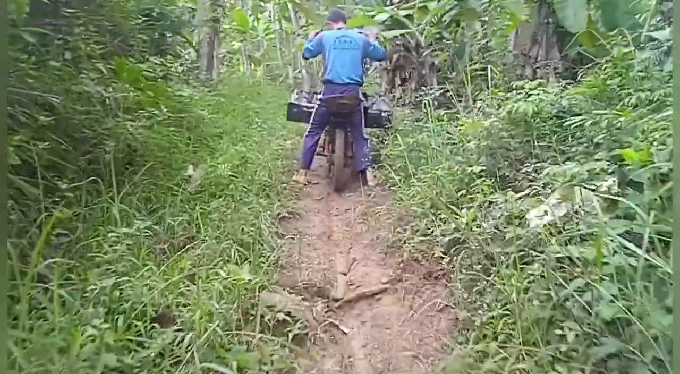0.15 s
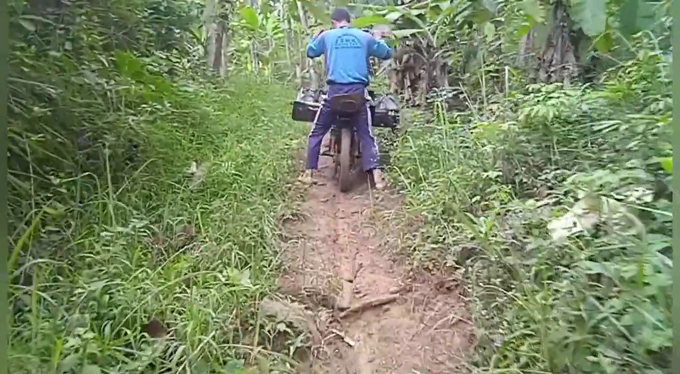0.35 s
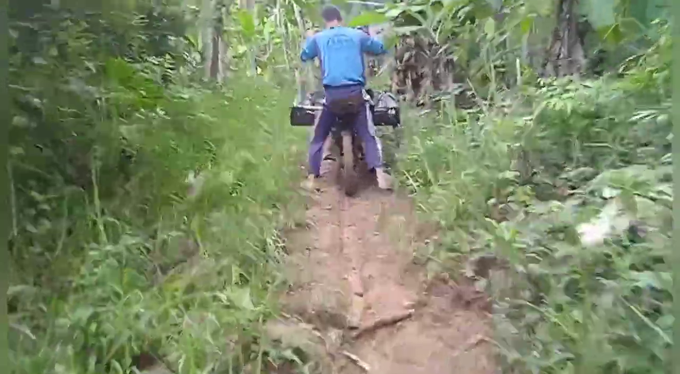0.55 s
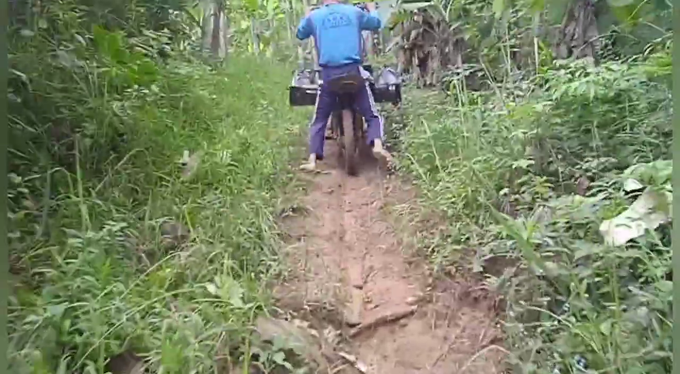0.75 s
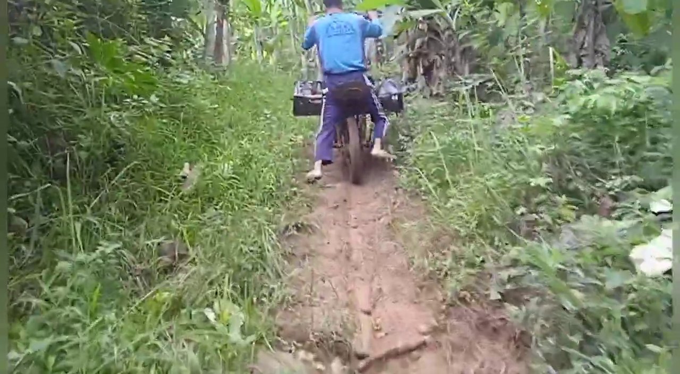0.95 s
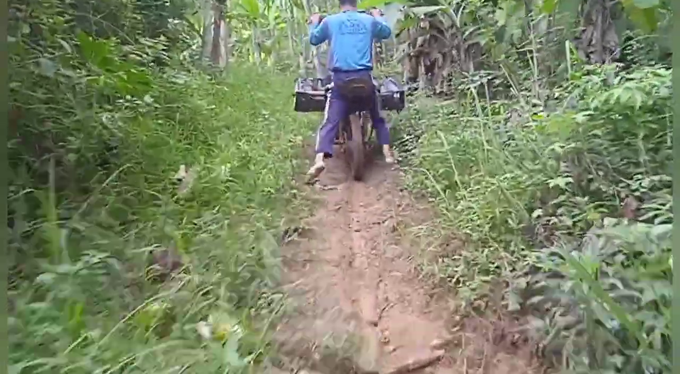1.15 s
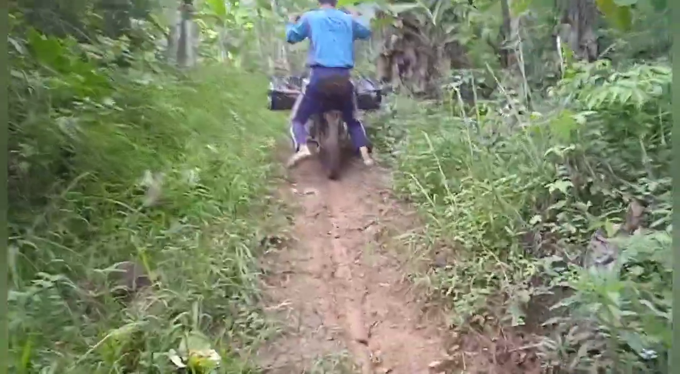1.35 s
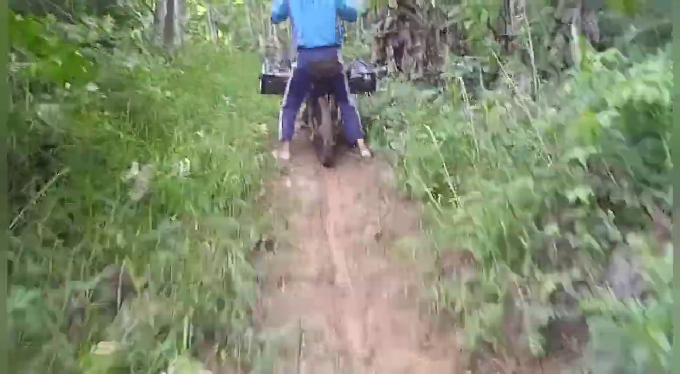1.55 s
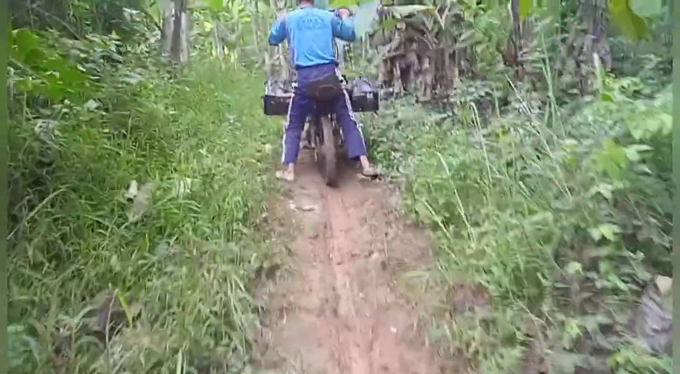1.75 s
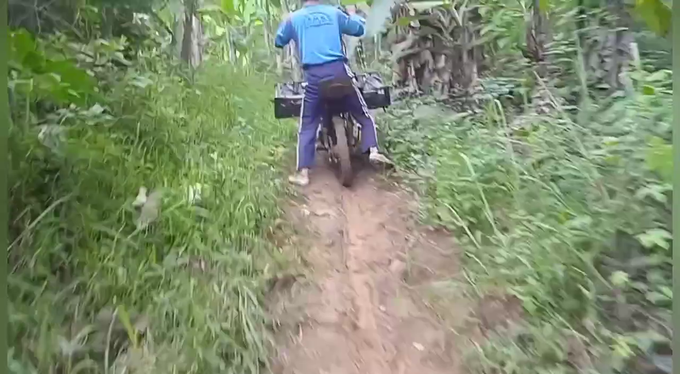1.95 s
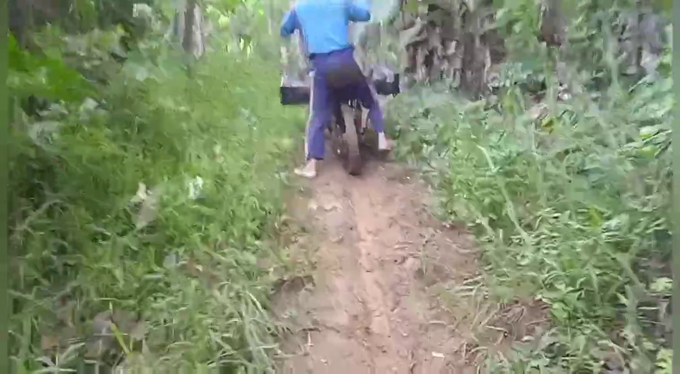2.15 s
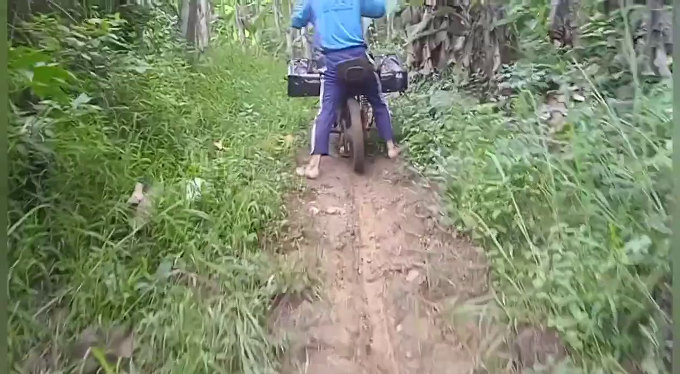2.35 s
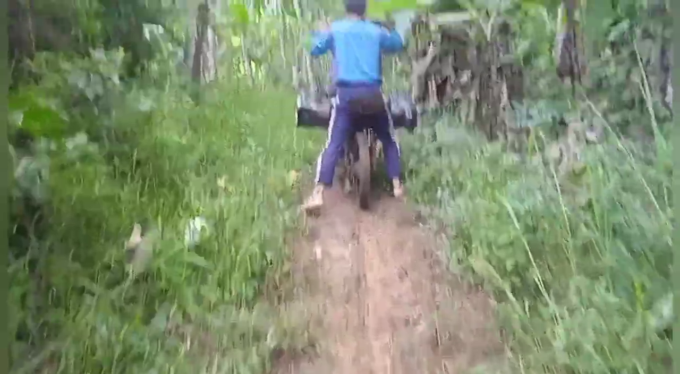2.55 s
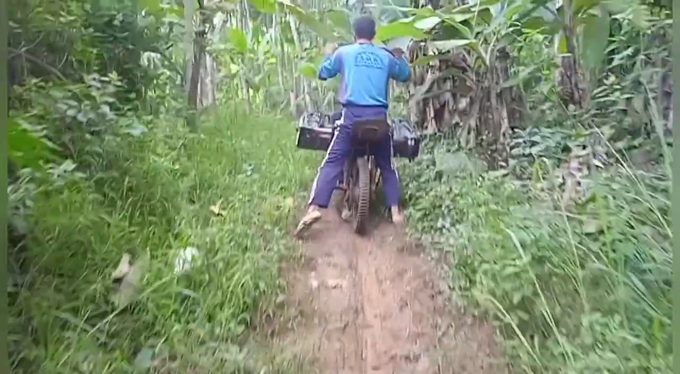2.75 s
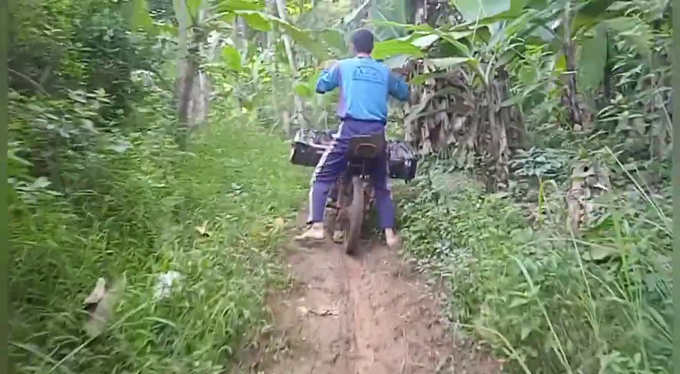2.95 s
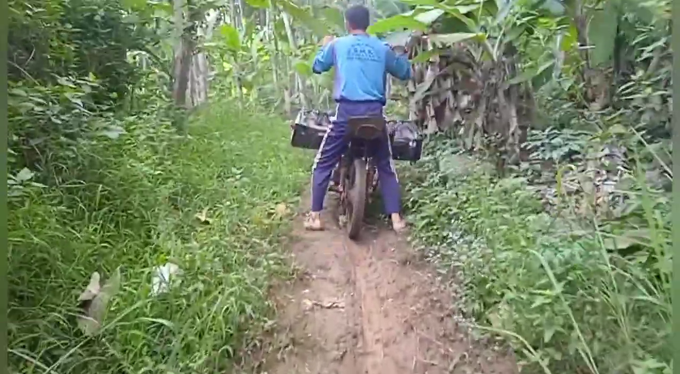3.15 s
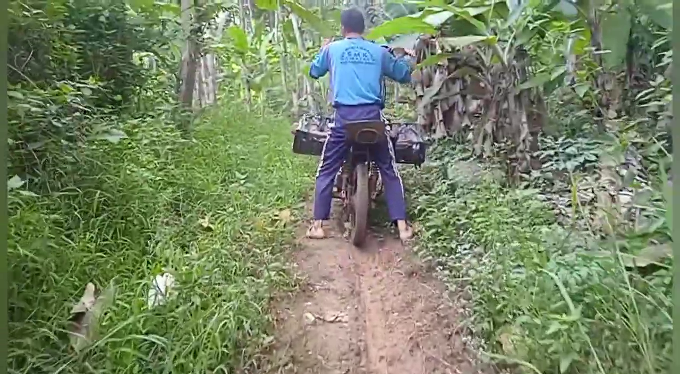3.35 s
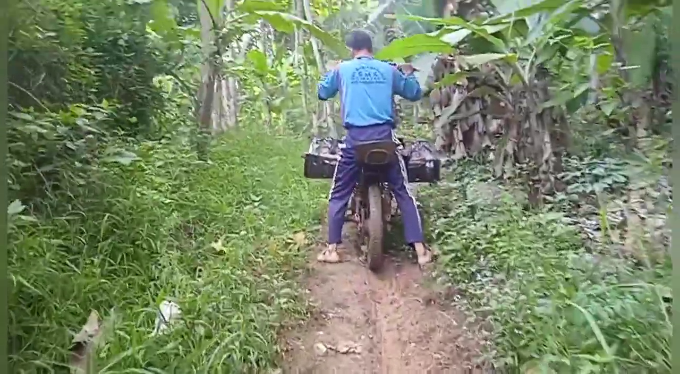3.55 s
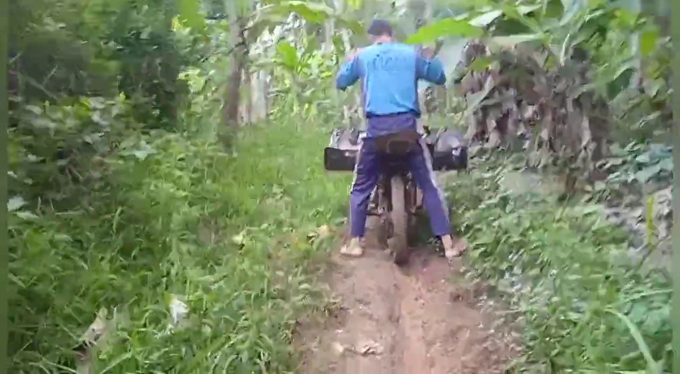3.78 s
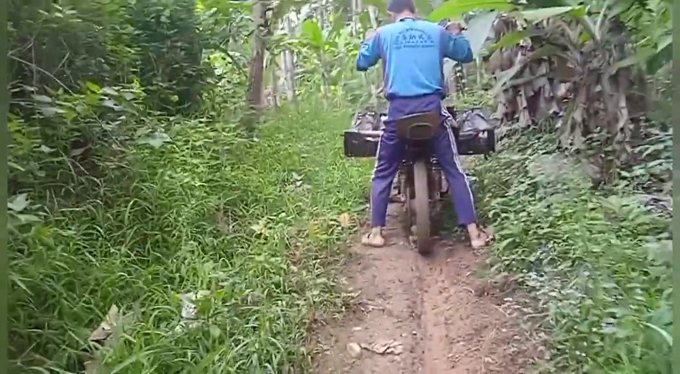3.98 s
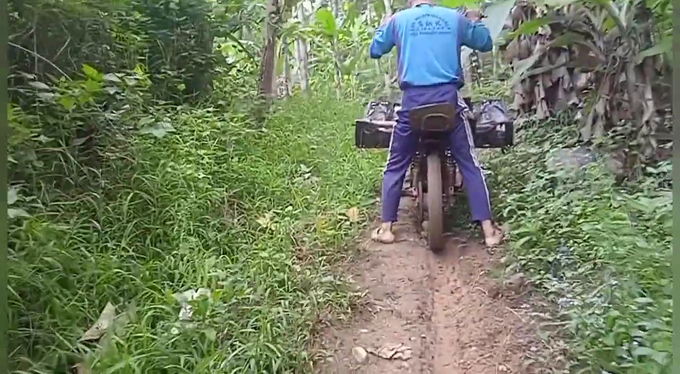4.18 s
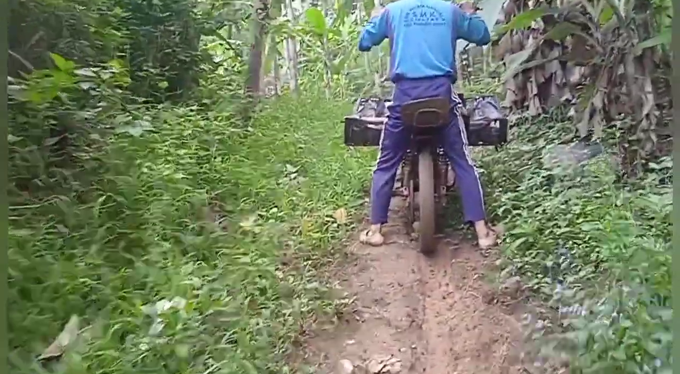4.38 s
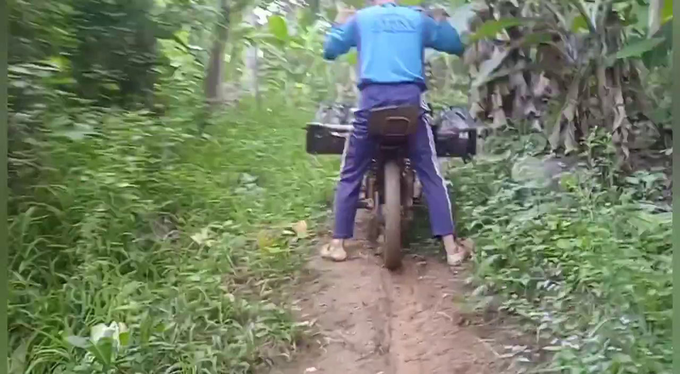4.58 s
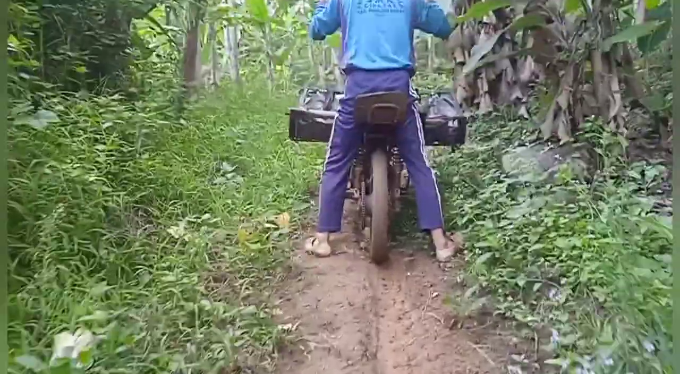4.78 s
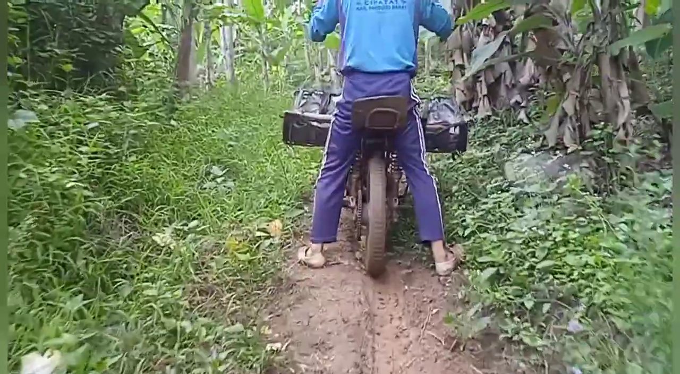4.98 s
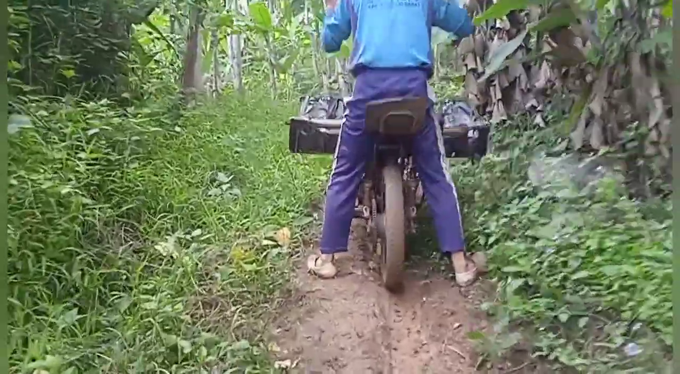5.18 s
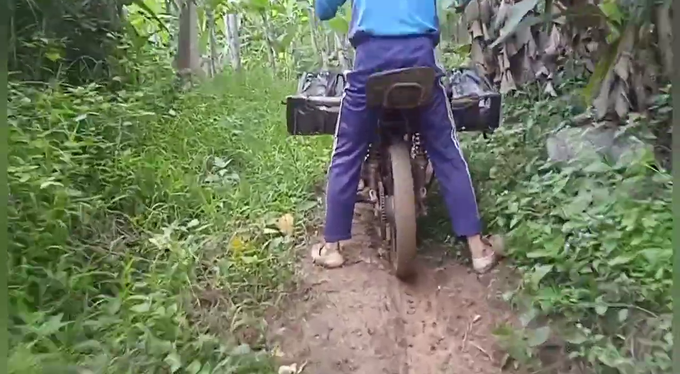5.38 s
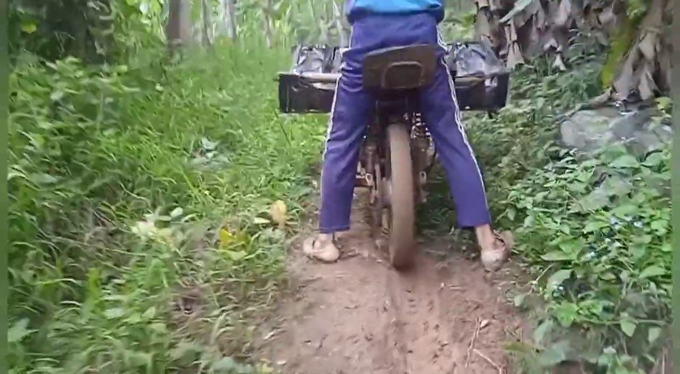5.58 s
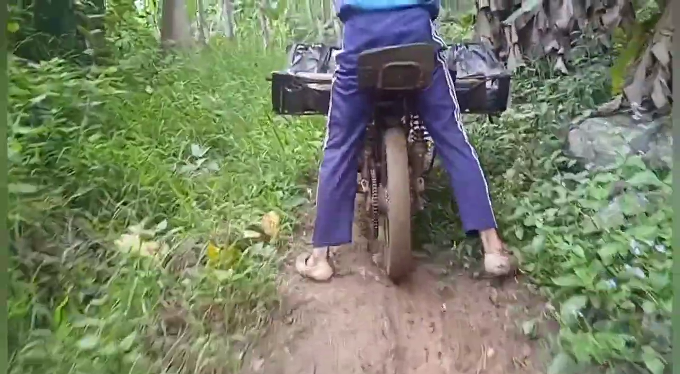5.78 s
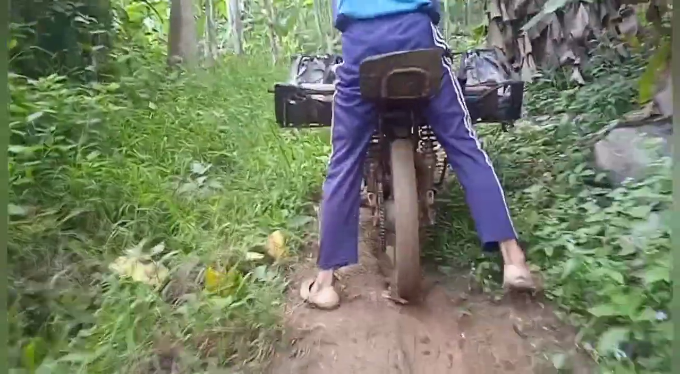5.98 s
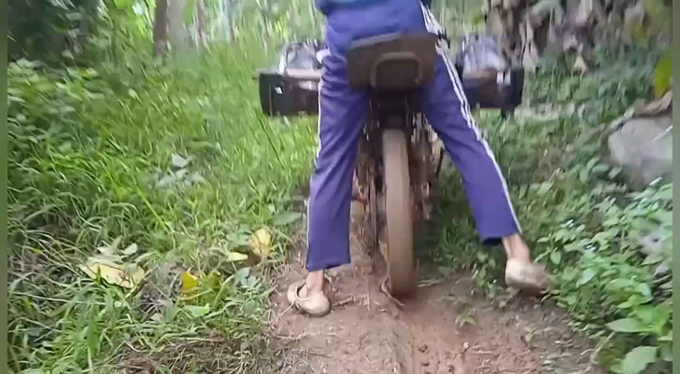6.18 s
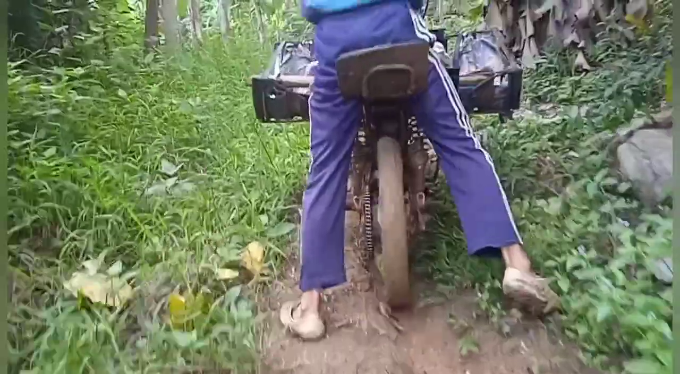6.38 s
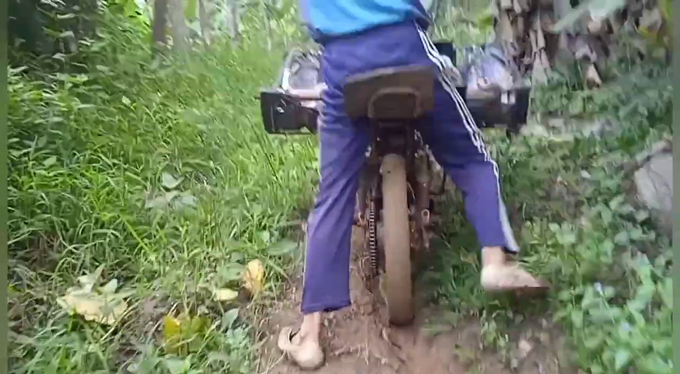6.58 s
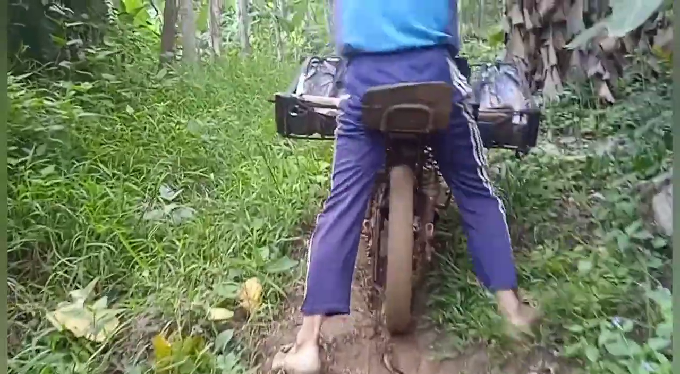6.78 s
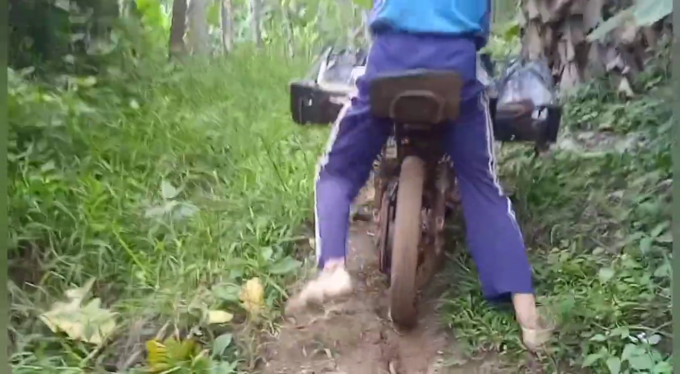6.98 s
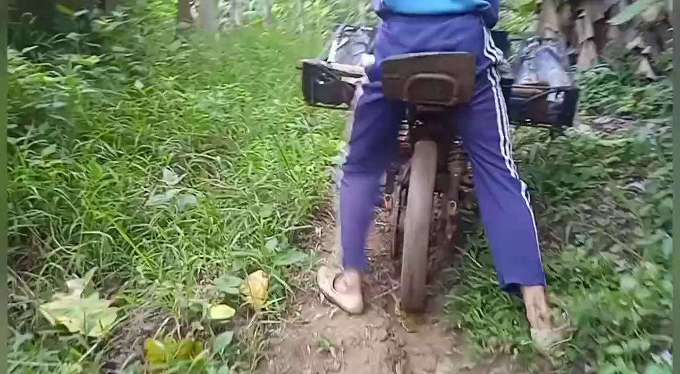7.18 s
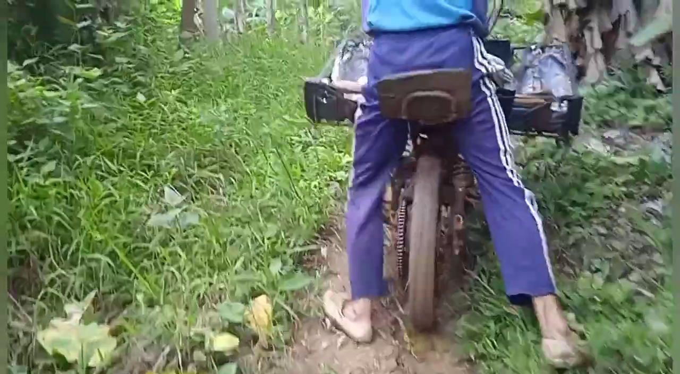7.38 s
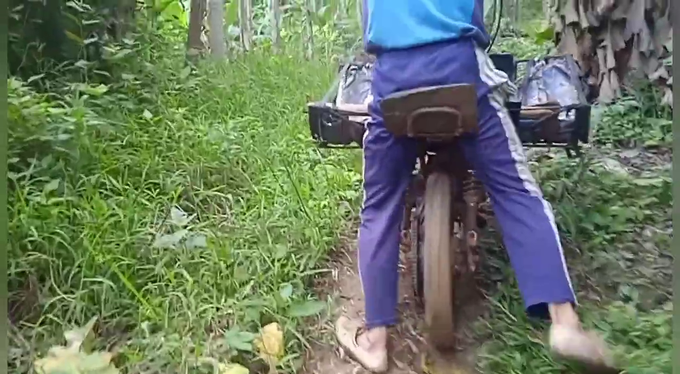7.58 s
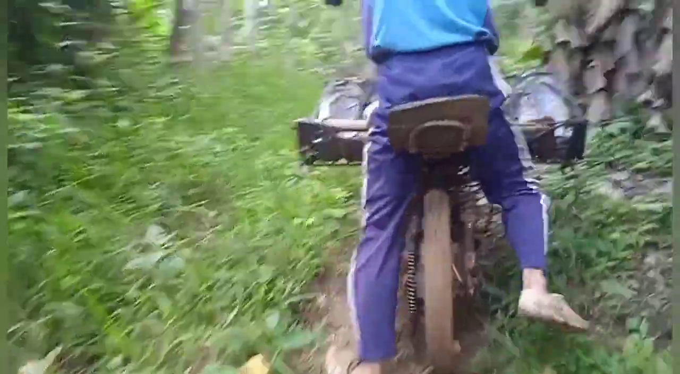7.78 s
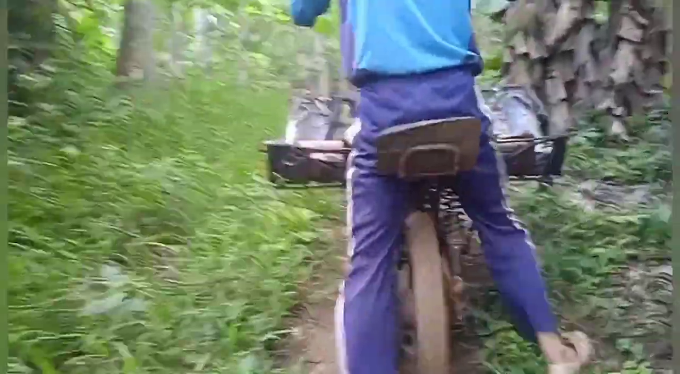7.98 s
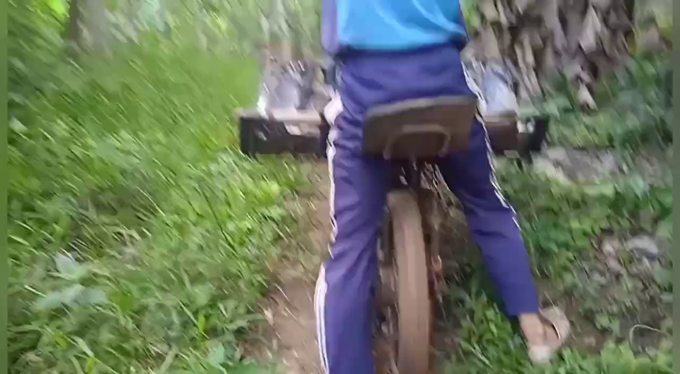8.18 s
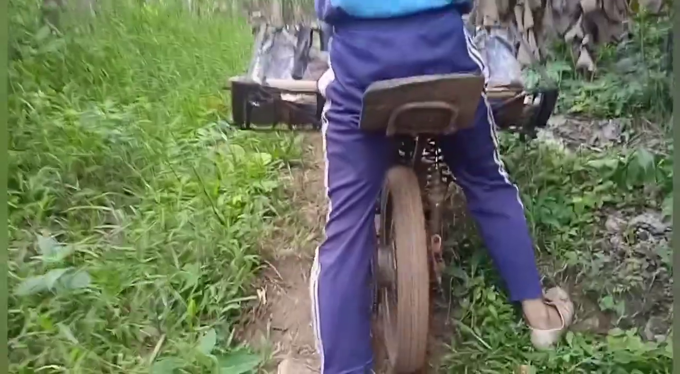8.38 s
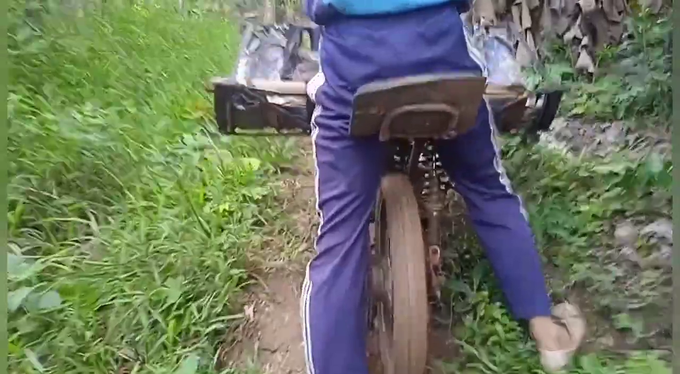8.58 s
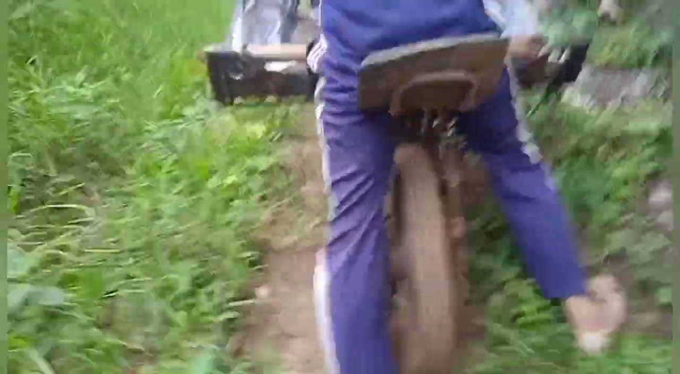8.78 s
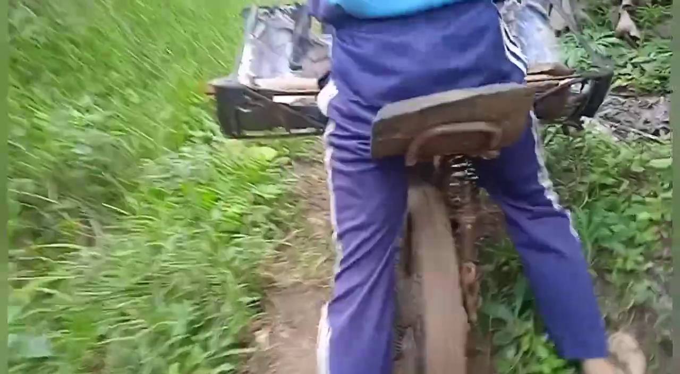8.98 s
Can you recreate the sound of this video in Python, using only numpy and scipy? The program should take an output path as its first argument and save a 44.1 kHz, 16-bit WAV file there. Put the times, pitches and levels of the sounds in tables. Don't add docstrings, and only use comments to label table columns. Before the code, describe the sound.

A small one-cylinder motorcycle labours up a forest dirt track, heard outdoors from a microphone following behind. At 0 s it is rather distant: soft, rapid exhaust thumps, about 25 per second, each with a hollow bark, thin ringing metal and a puff of hiss. It slows to about 21 per second by 1.5-2.5 s and is quietest around 1.6 s. From 3 s the pace picks up and the metal and hiss stand out more, around 4 s. By 5 s it is clearly closer and faster; it dips at about 5.7 s, then recovers and grows louder through 7 s. From 7.1 to 8.3 s it revs up to about 34 per second, brighter and loudest, and holds there to the end at 9 s. Chain and valve rustle runs beneath, a low frame hum joins the revs, and ground, bank and leaves add short, dull echoes.

```python
import sys
import numpy as np
from scipy import signal
from scipy.fft import rfft, irfft, next_fast_len
from scipy.io import wavfile
from scipy.ndimage import uniform_filter1d

SR = 44100
rng = np.random.default_rng(int(sys.argv[2]) if len(sys.argv) > 2 else 0)


def inscribe(sig):
    pcm = np.round(np.clip(np.atleast_2d(sig).T, -1, 1) * 32767)
    wavfile.write(sys.argv[1], SR, pcm.astype(np.int16))


def invert_db(x):
    u = np.asarray(x, float) / 20
    return 10 ** u


N = 398223
SPAN = 4096


def unit(x):
    return x / np.sqrt((x ** 2).sum(-1, keepdims=True) + 1e-20)


def column(table, s):
    t, *values = np.transpose(table)
    return [np.interp(s, t, v)[:, None] for v in values]


def chances(s, count, memory=5):
    fresh, slow = rng.standard_normal((len(s), count, 2)).T
    drift = uniform_filter1d(slow, memory, axis=1) * np.sqrt(memory)
    return fresh[:, :, None], drift[:, :, None]


def smooth_noise(shape, width):
    return uniform_filter1d(rng.standard_normal(shape), width, axis=1) * np.sqrt(width)


def swell(t, peak_s, sharp):
    u = np.maximum(t, 0) / peak_s
    return (u * np.exp(1 - u)) ** sharp


def mode(t, hz, t60, late=0):
    u = np.maximum(t, 0)
    return invert_db(-60 * u / t60) * np.sin(2 * np.pi * hz * u + late) * (t > 0)


def hump(hz, centre_hz, width_hz):
    return 1 / (1 + (2 * (hz - centre_hz) / width_hz) ** 2) ** 2


# (time [s], speed [firings/s])
ENGINE_SPEED = [(0.0, 25.336), (0.35, 25.12), (0.84, 22.273), (1.23, 21.952), (1.43, 20.948),
                (2.39, 20.814), (3.04, 21.373), (3.36, 22.241), (4.46, 23.163), (5.11, 24.854),
                (5.35, 24.476), (5.69, 22.582), (6.12, 23.978), (6.4, 24.389), (7.08, 24.611),
                (8.25, 33.803), (8.42, 34.467), (9.03, 34.21)]


def firings():
    first_turn = 0.6993
    clock = np.arange(N + SPAN) / SR
    turns = np.cumsum(column(ENGINE_SPEED, clock)[0]) / SR - first_turn
    early_s = (-2 + first_turn) / ENGINE_SPEED[0][1]
    return np.interp(np.arange(-1, int(turns[-1])), np.r_[-2, turns], np.r_[early_s, clock])


def revs(s):
    slow_per_s, fast_per_s = 21, 34.5
    return np.clip((column(ENGINE_SPEED, s)[0] - slow_per_s) / (fast_per_s - slow_per_s), 0, 1)


# (time [s], thump level [dB], metal and hiss level [dB], bearing [degrees])
LISTENER = [(0, -30.5, 2.5, 28), (0.5, -32, 1, -1), (1.1, -34, -2.5, -10), (1.6, -36, 0.5, 34),
            (2.1, -33, 2, -22), (2.8, -34.5, -1.5, 22), (3.4, -31, 4, 106), (3.9, -30, 5.5, 155),
            (4.4, -28.5, 3.5, 183), (4.85, -24, 0, 197), (5.2, -25.5, 2, 228), (5.8, -23, 0, 283),
            (6.3, -23, -2.5, 303), (7, -21.5, -2, 327), (7.6, -21.5, 2.1, 344), (8.05, -19, 0.3, 304),
            (8.5, -19, 3, 293), (9.03, -21, 3, 270)]


def nearness(s):
    far_db = -29.5
    return column(LISTENER, s)[0] - far_db


def beamed(s, mean_db, swing_db, aim):
    return mean_db + swing_db * np.cos(np.radians(column(LISTENER, s)[2] - aim))


# (pitch [Hz], decay to -60 dB [s], level [dB])
CHAMBERS = [
    (329.4, 0.041, 5),
    (497, 0.039, 1),
    (785, 0.074, -1.5),
]


def pipe(t, s, lead_s):
    fresh, slow = chances(s, count=6)
    near_db, rev = nearness(s), revs(s)
    age_s = np.maximum(s, 0)[:, None]

    cold_hz, warm_hz, warm_s = 237, 210, 3
    thump_hz = warm_hz + (cold_hz - warm_hz) * np.exp(-age_s / warm_s)
    thump_hz = thump_hz * (1 + 0.0083 * fresh[0])
    damping = (7.3 + (3.35 - 7.3) * rev ** 1.2) * (1 + 0.051 * fresh[3])
    thump = swell(t, 0.97 * lead_s, damping) * np.cos(2 * np.pi * thump_hz * (t - lead_s))

    bark_hz = 1.002 * 648.3 * (1 + 0.028 * rev) * (1 + 0.012 * fresh[1])
    far_ms, near_ms = 0.47, 1.57
    lag_ms = far_ms + (near_ms - far_ms) * np.clip(near_db / 1.4, 0, 1)
    sharp = 2.13 * np.exp(0.046 * fresh[4] + 0.58 * slow[4])
    bark = swell(t - lag_ms / 1000, 0.004, sharp) * np.cos(2 * np.pi * bark_hz * (t - lead_s))
    bark_db = -12 + 0.2848 * near_db + 0.21 * column(LISTENER, s)[1] + 1.4 * fresh[2]

    chambers = 0
    for k, (hz, t60, db) in enumerate(CHAMBERS):
        sag = (k == 2) * 0.066 * np.tanh(age_s / 4.7)
        pitch_hz = hz * (1 - sag + 0.025 * slow[k + 3])
        chambers = chambers + invert_db(db + 1.77 * slow[k]) * mode(t - lead_s + 1.249 / hz, pitch_hz, t60)
    chambers_db = -13 - 0.86 * near_db + 13.5 * rev
    return unit(thump) + unit(bark) * invert_db(bark_db) + unit(chambers) * invert_db(chambers_db)


# (pitch [Hz], decay to -60 dB [s], mean level [dB], swing [dB], loudest bearing [degrees])
SHELL_RINGS = [(1010, 0.032, -8, 3.5, 119), (1350, 0.014, -23, 15.5, 286), (1596, 0.037, -10, -0.5, 360),
               (1747, 0.027, -7.5, 0.5, 326), (1981, 0.023, -6, 6, 135), (2179, 0.03, -13.5, 3, 5.1),
               (2250, 0.029, -25.5, 14.5, 290), (2836, 0.033, -21, 3.5, 426)]
# (time [s], pitch [Hz], level against the shell [dB])
HEAT_SHIELD = [(0, 1130, -5), (2, 1186, -4.5), (4.3, 1110, -16), (5.1, 1205, -3), (5.9, 1096, -3),
               (6.6, 1173, 2), (7.1, 1192, 1), (7.6, 1160, -10), (9.03, 1240, -8.5)]


def ring(t, s, spread_db=1.56, drift_db=2.0):
    (size, size_drift), (bend, bend_drift), (late, _) = (chances(s, count=len(SHELL_RINGS)) for _ in range(3))
    shell = 0
    for k, (hz, t60, *facing_db) in enumerate(SHELL_RINGS):
        tilt_db = 13 * revs(s) * np.log2(hz / 2000)
        db = beamed(s, *facing_db) + tilt_db + spread_db * size[k] + drift_db * size_drift[k]
        loose = hz / 1900
        pitch_hz = hz * (1 + loose * (0.019 * bend[k] + 0.024 * bend_drift[k]))
        shell = shell + invert_db(db) * mode(t, pitch_hz, t60, loose * 1.2 * late[k])
    rattle = 1 + 0.2 * smooth_noise(shell.shape, 40)
    struck = unit(shell * rattle * (1 - np.exp(-np.maximum(t, 0) / 0.003)))

    buzz = irfft(rfft(rng.standard_normal(shell.shape)) * abs(rfft(shell)), SPAN)
    buzz = buzz * swell(t, 0.0043, 0.57)

    shield_hz, shield_db = column(HEAT_SHIELD, s)
    shield_hz = shield_hz * (1 + 0.017 * bend[0])
    shield = swell(t, 0.0038, 1.0) * np.sin(2 * np.pi * shield_hz * t)
    return struck + invert_db(-4.5) * unit(buzz) + invert_db(shield_db + 0.72 * size[0]) * unit(shield)


# (pitch [Hz], width [Hz], mean level [dB], swing [dB], loudest bearing [degrees])
JET_TONES = [(3654, 150, -15.5, 9, 370), (4763, 400, -4.5, 1, 343), (5410, 570, -18.5, 11.5, 257),
             (6070, 410, -9.5, 7, 180), (6510, 690, -8.5, 7, 118), (7400, 530, -13, 0.5, 160),
             (10130, 580, -22.5, 6.5, 170), (11800, 2000, -28, -1.5, 24)]
# (pitch [Hz], width [Hz], mean level [dB], swing [dB], loudest bearing [degrees])
TOP_SIZZLE = (14948, 950, -16, 2, 334)


def hiss(t, s, spread_db=3.0, drift_db=3.5, patchy_db=4.0):
    hz = np.fft.rfftfreq(SPAN, 1 / SR)
    (size, size_drift), (bend, bend_drift) = (chances(s, count=len(JET_TONES)) for _ in range(2))
    slow_bed_db, fast_bed_db = -20.5, -15
    bed_db = slow_bed_db + (fast_bed_db - slow_bed_db) * revs(s)
    patches = smooth_noise((len(s), len(hz)), 64)
    slope = (0.5 + 1 / (1 + (hz / 7800) ** 2.6)) * 3000 / (hz + 1)
    power = invert_db(2 * (bed_db + patchy_db * patches)) * (hz > 2300) * slope
    for k, (centre_hz, width_hz, *facing_db) in enumerate(JET_TONES):
        rev_db = 3 * revs(s) * (k == 1)
        db = beamed(s, *facing_db) + 3.0 + rev_db + spread_db * size[k] + drift_db * size_drift[k]
        moved_hz = centre_hz + width_hz * (0.39 * bend[k] + 0.23 * bend_drift[k])
        power = power + invert_db(2 * db) * hump(hz, moved_hz, width_hz)
    sizzle_db = beamed(s, *TOP_SIZZLE[2:]) + 0.05 * nearness(s) + 3.4 * size[0] + 1.4 * size_drift[1]
    power = power / power.sum(1, keepdims=True) * len(hz) / 30
    power = power + invert_db(2 * sizzle_db) * hump(hz, *TOP_SIZZLE[:2])

    eddies = rfft(rng.standard_normal((len(s), SPAN)))
    jet = irfft(eddies * np.sqrt(power), SPAN)
    spent = irfft(eddies * power ** 0.35 / (1 + (hz / 9000) ** 0.79), SPAN)
    crackle = invert_db(2.2 * smooth_noise(jet.shape, 64))
    u = np.maximum(t, 0)
    blow_down = invert_db(-19.0 - 60 * u / 0.065) + invert_db(-11.5 - 60 * u / 0.33)
    blow_down = blow_down * (1 - np.exp(-u / 0.0042))
    puff = jet * swell(t - 0.0012, 0.0022, 1.07)
    return unit(crackle * (puff + spent * invert_db(-1.5) * blow_down))


# (pitch [Hz], width [Hz], share removed [0-1])
SILENCER_TRAPS = [
    (398.3, 64, 0.51),
    (859, 43, 1),
]
# (time [s], ground level [dB], ground delay [ms], bank delay [ms])
REFLECTIONS = [(0, -27, 3.4, 8.14), (1.5, -81, 7.5, 8.6), (2.7, -12.5, 4.45, 9.04),
               (3.4, -16.5, 5.56, 9.75), (4.8, -11.5, 5.45, 8.46), (5.3, -12, 6.2, 8.95),
               (5.9, -38, 4.6, 8.4), (6.6, -39, 18, 7.2), (7.3, -41, 5.2, 7.9), (7.7, -19, 5.7, 7.7),
               (8.3, -17, 5.77, 9), (9.03, -20, 4.75, 8.4)]


def echoed(shots, s):
    hz = np.fft.rfftfreq(SPAN, 1 / SR)
    slow_cut_hz, fast_cut_hz = 99, 154
    cut_hz = slow_cut_hz + (fast_cut_hz - slow_cut_hz) * revs(s) ** 1.65
    outlet = 1 / np.sqrt(1 + (cut_hz / (hz + 1)) ** 9)
    for k, (trap_hz, width_hz, share) in enumerate(SILENCER_TRAPS):
        hot_hz = trap_hz * (1 + k * 0.154 * revs(s) ** 2)
        outlet = outlet * (1 - share * hump(hz, hot_hz, width_hz))

    ground_db, ground_ms, bank_ms = column(REFLECTIONS, s)
    bank_db = -11.5 - 0.34 * nearness(s) - 9.5 * revs(s)
    soft = 1 / np.sqrt(1 + (hz / 2500) ** 2)
    ground = invert_db(ground_db) * np.exp(-2j * np.pi * hz * ground_ms / 1000)
    bank = invert_db(bank_db) * np.exp(-2j * np.pi * hz * bank_ms / 1000)
    return irfft(rfft(shots) * outlet * (1 + soft * (ground + bank)), SPAN)


def engine(lead_s=0.0047):
    s = firings()
    rest = SPAN // 8
    t = (np.arange(SPAN)[None] - rest) / SR
    fresh, _ = chances(s, count=3)
    thump_db, metal_db, _ = column(LISTENER, s)
    shots = pipe(t, s, lead_s)
    shots += ring(t, s) * invert_db(-13 + metal_db + 1.2 * fresh[0])
    shots += hiss(t, s) * invert_db(-14.5 + 0.48 * metal_db + 1.1 * fresh[1])
    charge_db = 0.84 * fresh[2]
    per_firing = np.sqrt(SR / column(ENGINE_SPEED, s)[0])
    shots = echoed(shots * invert_db(thump_db + charge_db) * per_firing, s)

    start = np.round((s - lead_s) * SR).astype(int)[:, None]
    at = start + np.arange(SPAN) - rest + SPAN
    return np.bincount(at.ravel(), shots.ravel(), N + 3 * SPAN)[SPAN:SPAN + N]


def foliage(x, t60=0.046):
    t = np.arange(SR // 4) / SR
    hits = rng.random(len(t)) < 2500 / SR
    taps = rng.choice([-1., 1.], len(t)) * hits * invert_db(-60 * t / t60) * (t > 0.006)
    bright = signal.sosfilt(signal.butter(1, 500, "high", fs=SR, output="sos"), x)
    return signal.fftconvolve(bright, unit(taps))[:N]


def crank(third_db=-7):
    t = np.arange(N) / SR
    cycles = np.cumsum(column(ENGINE_SPEED, t)[0]) / SR
    shake = np.sin(2 * np.pi * 2 * cycles) + invert_db(third_db) * np.sin(2 * np.pi * 3 * cycles)
    wobble_db = 1.2 * np.interp(t, np.arange(300) / 30, rng.standard_normal(300))
    slow_db, fast_db = -91, -42
    hum_db = slow_db + (fast_db - slow_db) * revs(t)[:, 0] ** 0.51
    return np.sqrt(2) * invert_db(wobble_db + hum_db) * shake


# (pitch [Hz], level per Hz [dB])
WASH_COLOUR = [(12, -65), (38, -14), (232, -2), (343, -18), (1630, -8), (3280, -22.5), (8940, -32.5),
               (15600, -86)]


def wash(follow=0.46, patchy_db=2.5):
    hz = np.fft.rfftfreq(1024, 1 / SR)
    a, b, patches = rng.standard_normal((N // 256 + 5, 513, 3)).T
    patches = uniform_filter1d(uniform_filter1d(patches, 10, 0), 12, 1)
    f, db = np.transpose(WASH_COLOUR)
    colour_db = np.interp(np.log(hz + 1), np.log(f + 1), db)[:, None]
    field_db = colour_db + patchy_db * patches / patches.std()
    sizzle = invert_db(-30) * np.sqrt(hump(hz, *TOP_SIZZLE[:2]))[:, None]
    trap = 1 - 1.7 * hump(hz, SILENCER_TRAPS[1][0], 160)[:, None]
    spectrum = (a + 1j * b) * (invert_db(field_db) * trap + sizzle)
    noise = signal.istft(spectrum, nperseg=1024, noverlap=768)[1][:N]

    t = np.arange(N) / SR
    near_db = column(LISTENER, t)[0][:, 0]
    rev_db = 3 * revs(t)[:, 0]
    return unit(noise) * np.sqrt(N) * invert_db(-47 + follow * (near_db + 32.5) + rev_db)


def scene():
    direct = engine()
    return (direct + invert_db(-13) * foliage(direct) + crank() + wash())[None]


def roll_off(x):
    return signal.sosfilt(signal.butter(12, 16790, fs=SR, output="sos"), x)


def record(dry):
    ceiling, edge_hz = 1, 15600
    size = next_fast_len(N)
    limited = ceiling * np.tanh(dry / ceiling)
    edge_db = -42 / (1 + np.exp((edge_hz - np.fft.rfftfreq(size, 1 / SR)) / 70))
    mix = irfft(rfft(limited, size) * invert_db(edge_db), size)[:, :N]
    return roll_off(mix)


dry = scene()
out = record(dry)
inscribe(out)
```